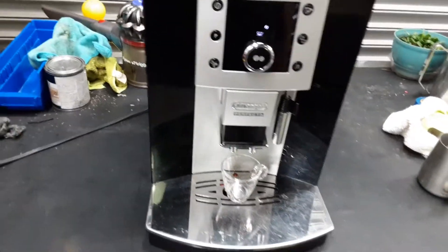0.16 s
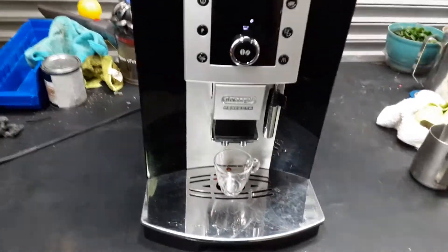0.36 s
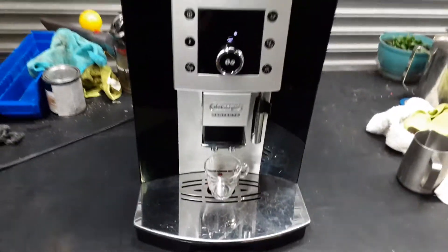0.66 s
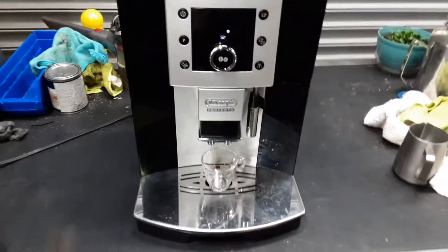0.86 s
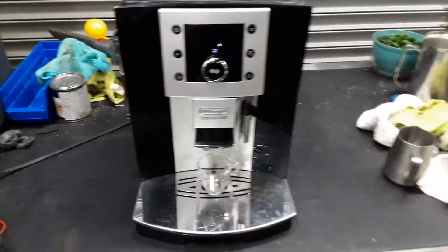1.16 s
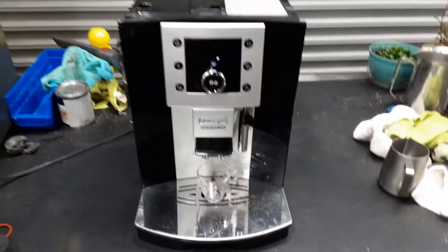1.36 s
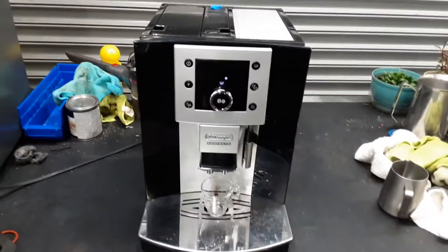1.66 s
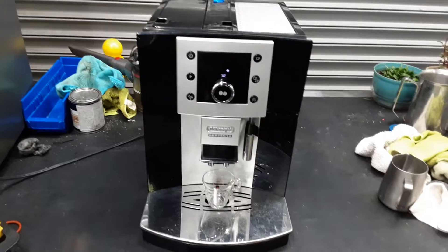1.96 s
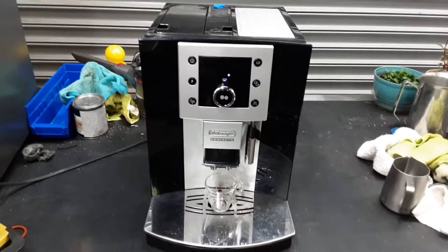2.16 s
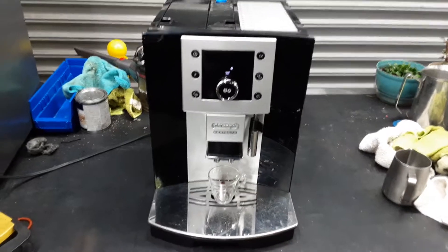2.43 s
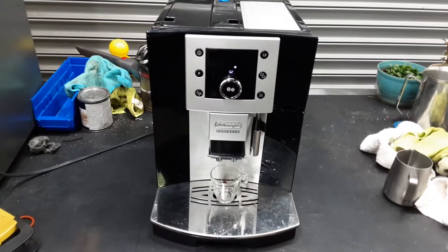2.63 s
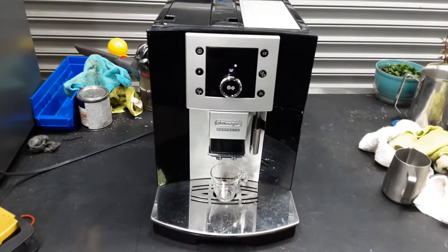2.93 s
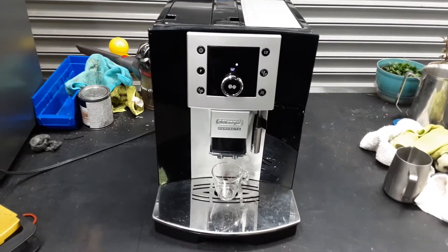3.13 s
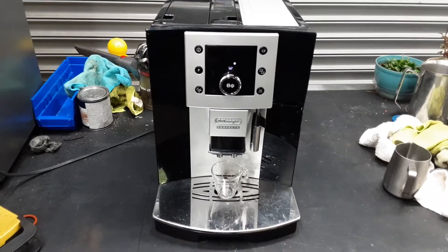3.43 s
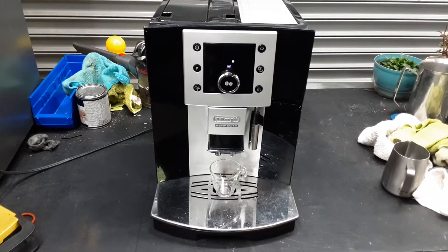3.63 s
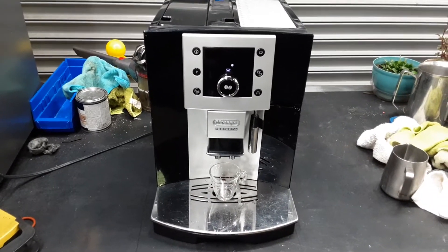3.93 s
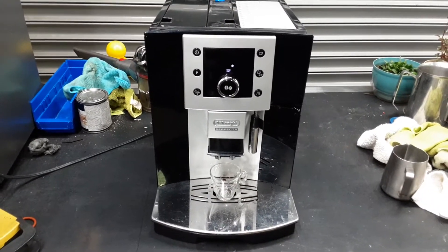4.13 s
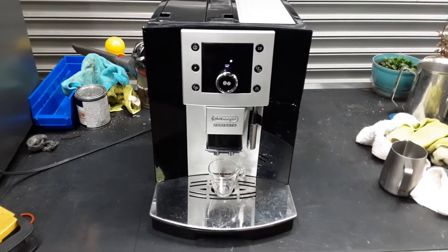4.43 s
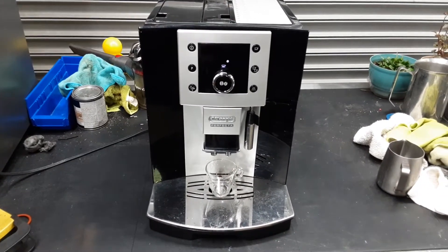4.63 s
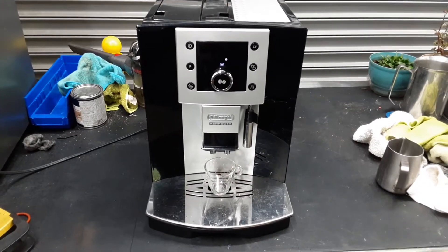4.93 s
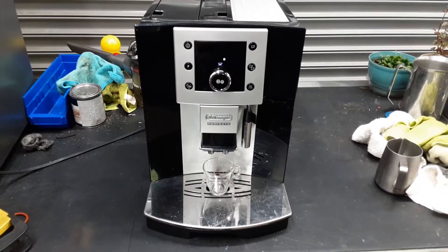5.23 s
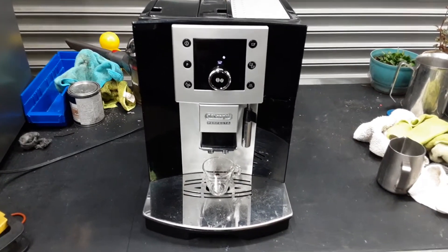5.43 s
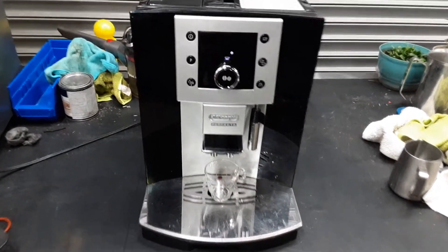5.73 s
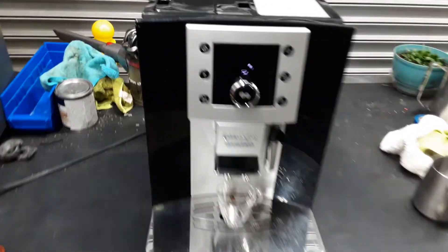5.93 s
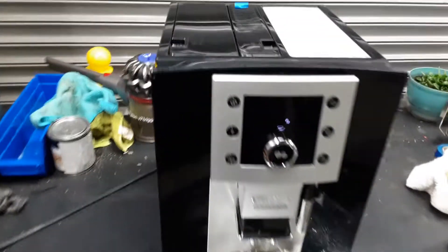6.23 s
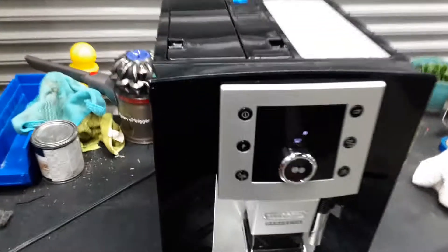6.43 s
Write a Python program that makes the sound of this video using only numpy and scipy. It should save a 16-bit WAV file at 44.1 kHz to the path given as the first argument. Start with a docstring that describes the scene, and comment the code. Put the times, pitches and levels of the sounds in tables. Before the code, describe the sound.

Close to an automatic coffee machine in a workshop with soft ventilation rumble. Two faint control clicks come first, then a geared motor whirs with a raspy, fluttering, toothed buzz, and dull plastic knocks sound early in its travel. It coasts quickly to a stop. After a short gap a bean grinder surges up and keeps running, rough and crunchy with a deep drone and thin whine, growing stronger as the microphone moves closer at the end.

```python
"""A workshop bench with an automatic coffee machine on it, taken in mono from close by over room ventilation.
Two light clicks of the controls, then a geared motor whirs and coasts to a stop: toothed lines and rasp,
swelling once a turn, with knocks of the brew unit as bursts and rings early in its travel.
Then the mains-driven grinder runs up: shaped noise for the beans, shaken tones for the shaft and commutator.
Its deep drone and its whine grow as the microphone moves closer."""
import sys
import numpy as np
from scipy import signal
from scipy.fft import rfft, irfft
from scipy.io import wavfile

SR = 44100
rng = np.random.default_rng(int(sys.argv[2]) if len(sys.argv) > 2 else 0)


def inscribe(sig):
    """Save sig as 16-bit PCM at rate SR to the path in sys.argv[1].

    A 1-D sig is mono; a 2-D sig holds one channel per row.
    Samples are clipped to [-1, 1] before scaling.
    """
    pcm = np.round(np.clip(np.atleast_2d(sig).T, -1, 1) * 32767)
    wavfile.write(sys.argv[1], SR, pcm.astype(np.int16))


N = 290178
TIME = np.arange(N) / SR
BINS = np.fft.rfftfreq(N, 1 / SR)

MAINS_HZ = 60
MAINS_PULSE = 2 * np.pi * 2 * MAINS_HZ * TIME  # phase of the power pulses, two a mains cycle
DRIVE_ON_S, DRIVE_OFF_S = 1.103, 3.467  # the gear motor's switch
GRINDER_ON_S, BITE_S = 3.984, 0.0077  # the grinder's start, and the time for its burrs to bite


def amp(db):
    """Decibels to gain."""
    return 10 ** (np.asarray(db) / 20)


def unit(x):
    """Scales to rms 1."""
    return x / np.sqrt(np.mean(x ** 2) + 1e-20)


def read(points, hz):
    """Reads a spectrum on a log-frequency axis."""
    f, value = np.transpose(points)
    return np.interp(np.log(hz + 1), np.log(f + 1), value)


def colour(x, spectrum):
    """Filters x with a spectrum's relative levels, then scales to rms 1."""
    return unit(irfft(rfft(x) * amp(read(spectrum, BINS)), N))


def noise():
    """White noise."""
    return rng.standard_normal(N)


def wander(hz):
    """Slow chance of rms 1, up to about hz."""
    return unit(irfft(rfft(noise()) * np.exp(-(BINS / hz) ** 2), N))


def curve(points):
    """Joins (s, value) points into a curve over time."""
    return np.interp(TIME, *np.transpose(points))


def since(s):
    """Seconds elapsed after s, zero before."""
    return np.maximum(TIME - s, 0)


def rise(s, lag):
    """Climbs from 0 at time s towards 1, with a time constant of lag seconds."""
    return 1 - np.exp(-since(s) / lag)


def add(mix, s, sound):
    """Mixes a sound in at s seconds."""
    part = mix[round(s * SR):][:len(sound)]
    part += sound[:len(part)]


def ring(modes):
    """Dying sines of a struck object."""
    t = TIME[:SR // 2]
    return sum(amp(db - 60 * t / t60) * np.sin(2 * np.pi * hz * t) for hz, db, t60 in modes)


def burst(hz, octaves, t60):
    """A sudden, dying puff of noise round a centre frequency."""
    t = TIME[:SR // 2]
    edges = hz * 2. ** np.array([-octaves, octaves])
    edges = np.minimum(edges, [SR / 2 - 2000, SR / 2 - 1000])  # stay below half the sample rate
    band = signal.butter(3, edges, "bandpass", fs=SR, output="sos")
    puff = rng.standard_normal(len(t)) * amp(-60 * t / t60)
    return signal.sosfilt(band, puff) * np.sqrt(SR / 2 / np.ptp(edges))  # narrow bands keep their strength


def reverb(x):
    """The workshop's tail: noise whose bands die at their own speeds."""
    # time for each band of the room to fall by 60 dB: f/Hz, t60/s
    room_t60 = [(150, 1), (1000, 0.33), (3000, 0.6), (7000, 0.35), (15000, 0.22)]
    hz, _, bands = signal.stft(rng.standard_normal(SR // 2), SR, nperseg=256)
    # the frames of the transform are read 128 samples apart
    t = np.arange(bands.shape[1]) * 128 / SR
    tail = signal.istft(bands * amp(-60 * t / read(room_t60, hz)[:, None]), SR, nperseg=256)[1]
    return signal.fftconvolve(x, tail / np.linalg.norm(tail))[:N]


def room_tone(vent_db=-58, air_db=-74.5, waver=0.038, hiss_db=-61.5, hiss_fall_db_per_s=75):
    """Ventilation rumble and faint air as shaped noise, wavering hum tones, and a soft hiss dying at the start."""
    # ventilation rumble: f/Hz, relative level/dB per Hz
    vent_spectrum = [(18, -47), (30, -43), (49, -13.5), (86, -11.5), (106, -21.5), (178, -10), (288, -16.5),
                     (324, -10.5), (364, -13), (383, -13.5), (909, -24.5), (1600, -36.5), (2080, -76),
                     (3520, -120)]
    # faint air: f/Hz, relative level/dB per Hz
    air_spectrum = [(880, -39), (1500, -36), (1860, -3.5), (2160, 0.5), (2630, -6), (2960, -17),
                    (4020, -14.5), (4350, -5), (5240, -10.5), (5840, -9), (6640, -11), (7260, -11.5),
                    (9280, -25), (11300, -9), (15800, -18)]
    # opening hiss: f/Hz, relative level/dB per Hz
    hiss_spectrum = [(710, -36), (1200, -6), (1870, -3), (2060, -3), (2220, 2), (2750, -13), (7430, -8.5),
                     (8450, -18), (12100, -9), (15800, -16)]
    # room hum: f/Hz, level/dB
    hum_tones = [(253.0, -67.5), (296.1, -66), (359.7, -60)]
    hum = sum(amp(db) * np.sqrt(2) * np.sin(2 * np.pi * hz * TIME) * (1 + waver * wander(12))
              for hz, db in hum_tones)
    vent = amp(vent_db) * colour(noise(), vent_spectrum)
    air = amp(air_db) * colour(noise(), air_spectrum)
    hiss = amp(hiss_db - hiss_fall_db_per_s * TIME) * colour(noise(), hiss_spectrum)
    return vent + air + hum + hiss


def clicks(room_db=-5, attack_s=0.00047):
    """Light clicks of the controls: dry ticks of dying noise with a faint metallic ring."""
    # clicks: t/s, level/dB, t60/s, metallic ring level/dB (ring() is halved below)
    click_events = [(0.281, -52, 0.088, -50.5), (0.58, -44, 0.088, -78)]
    # tick: f/Hz, relative level/dB per Hz
    tick_spectrum = [(590, -29), (1000, 2), (1700, -9), (1930, -16), (2170, -2), (2730, -6), (2890, -4),
                     (3250, -7), (5400, -2), (7120, -3), (9180, -18), (11700, 0.5), (15800, -17)]
    # metallic ring: f/Hz, relative level/dB, t60/s
    metal_modes = [(5303, -5, 0.12), (6153, -10, 0.14), (6720, -1, 0.11), (6900, 1, 0.092),
                   (7150, -9, 0.15)]
    out = np.zeros(N)
    for s, db, t60, ring_db in click_events:
        envelope = amp(db - 60 * TIME / t60) * (1 - np.exp(-TIME / attack_s))
        add(out, s, envelope * colour(noise(), tick_spectrum))
        add(out, s, amp(ring_db) * ring(metal_modes) / 2)
    return out + amp(room_db) * reverb(out)


def drive_state(spin_up_s=0.026, coast_s=0.17, load_on_s=1.61, load_lag_s=0.12):
    """The gear motor's share of its running speed, and its load (0 running free, 1 pushing the brew unit)."""
    spin = rise(DRIVE_ON_S, spin_up_s) * np.maximum(1 - since(DRIVE_OFF_S) / coast_s, 0)
    return spin, rise(load_on_s, load_lag_s)


def run_up(missing_share=0.42, run_up_s=0.19):
    """The share of its running speed the grinder still lacks; it draws extra current until this is gone."""
    return missing_share * np.exp(-since(GRINDER_ON_S) / run_up_s)


def mains_hum(drive_db=-59, load_db=5.0, grinder_db=-55.0, inrush_db=13, second_db=-8, third_db=-9):
    """The machine hums at even multiples of the mains, as strongly as its motors draw current."""
    spin, load = drive_state()
    drive_current = spin * amp(drive_db + load_db * load)
    grinder_current = rise(GRINDER_ON_S, BITE_S) * amp(grinder_db + inrush_db * run_up())
    hum = sum(amp(db) * np.sin((k + 1) * MAINS_PULSE) for k, db in enumerate([0, second_db, third_db]))
    return (drive_current + grinder_current) * np.sqrt(2) * hum


def gear_motor(tones_db=-39.8, rasp_db=-48, casing_db=-49.5, treble_db=-54.0, overtones_db=-56.0,
               sing_db=-53.5, mesh_load_db=-1.24, sing_load_db=-10, engage_s=0.13, mesh_power=2.9,
               rattle_power=1.55, jitter=0.0019, flutter=0.16, throb_start=0.83, throb_end=0.41,
               room_db=-7, casing_throb=0.054, wobble_rad=0.01):
    """An off-centre gear bites harder and drags once a turn, swelling tones, rasp and casing; it sings when free."""
    # running speed, sagging as the brew unit resists: t/s, turn rate/Hz
    drive_speed = [(1.2, 58.6), (1.45, 59.9), (1.6, 59.4), (1.74, 57.3), (2.0, 56.4), (2.45, 56.9),
                   (2.65, 57.5), (3.05, 56.9), (3.3, 57.4)]
    # teeth in mesh: multiple of the turn rate, relative level/dB
    gear_orders = [(20.1, -17.5), (21, 3.5), (22, 2), (24, 4)]
    # gear tones that do not throb: multiple of the turn rate, relative level/dB
    gear_overtones = [(11.4, -6), (13, -6), (35, -15), (38.1, -13), (43, -14), (44, -11), (45, -15),
                      (48, -13.5)]
    # rasp of the gearbox: f/Hz, relative level/dB per Hz
    gearbox_spectrum = [(650, -41), (1095, -46), (1145, 9), (1220, 12.5), (1280, 4), (1410, 10.5),
                        (1550, -22), (2020, -35), (3410, -120)]
    # casing rattle, lower part: f/Hz, relative level/dB per Hz
    casing_spectrum = [(29, -47), (50, -14), (118, -9.5), (146, -11), (229, 1.5), (327, -12), (362, 1.5),
                       (433, -12), (741, -9.5), (864, -14.5), (1060, -8), (1380, -64), (2330, -120)]
    # casing rattle, treble: f/Hz, relative level/dB per Hz
    treble_spectrum = [(880, -30.5), (1500, 1.5), (1610, -4.5), (1880, -8.5), (2000, -6.5), (2340, -10.5),
                       (2600, -10.5), (3020, -15), (3750, -21), (5780, -25.5), (6640, -22.5), (7470, -24),
                       (9370, -37), (11500, -29), (15800, -36)]

    spin, load = drive_state()
    angle = 2 * np.pi * np.cumsum(spin * curve(drive_speed) * (1 + jitter * wander(30.0))) / SR
    throb = np.clip(curve([(DRIVE_ON_S, throb_start), (DRIVE_OFF_S, throb_end)]), 0, 1)
    bite = 1 - throb * np.cos(angle)
    shake = 1 - casing_throb * np.cos(angle)

    def tones(orders, turn):
        """Fluttering lines on multiples of the turn rate."""
        return np.sqrt(2) * sum(amp(db) * (1 + flutter * wander(40)) * np.cos(k * turn) for k, db in orders)

    teeth = tones(gear_orders, angle + wobble_rad * throb * np.sin(angle))
    teeth /= np.linalg.norm([amp(db) for _, db in gear_orders])
    rasp = amp(rasp_db) * colour(noise() * bite, gearbox_spectrum)
    teeth = amp(tones_db) * bite * teeth + rasp
    sing = amp(sing_db + sing_load_db * load) * np.sqrt(2) * np.cos(36 * angle)
    casing = amp(casing_db) * colour(noise(), casing_spectrum)
    casing = shake * (casing + amp(treble_db) * colour(noise(), treble_spectrum))
    overtones = amp(overtones_db) * tones(gear_overtones, angle)
    mesh = rise(DRIVE_ON_S, engage_s) * spin ** mesh_power  # slow teeth hardly ring the gearbox
    rattle = spin ** rattle_power
    return (mesh * (teeth * amp(mesh_load_db * load) + sing) + rattle * (casing + overtones)
            + amp(room_db) * reverb(rattle * casing))


def knocks(ring_db=-17, room_db=-9, bright_hz=1000, t60=0.031):
    """The plastic brew unit knocks as it travels; dull blows ring its body most."""
    # knocks: t/s, level/dB, centre f/Hz, half width/octaves
    knock_events = [(1.122, -46, 790, 0.68), (1.163, -34, 607, 0.61), (1.179, -39, 332, 1.1),
                    (1.636, -29.5, 1940, 0.27), (1.7838, -27, 710, 1.07), (1.791, -27.5, 200, 1.04),
                    (1.803, -31.5, 290, 1.14), (1.841, -34, 320, 2.04), (1.861, -39, 240, 1.6)]
    # body of the brew unit: f/Hz, relative level/dB, t60/s
    brew_unit_modes = [(89, 2.5, 0.16), (183, -1, .09), (251, 4, 0.13), (419, 2, 0.1), (660, 9, .07),
                       (1004, 9, 0.061), (1490, -1, 0.079), (2080, -7, .06)]
    out = np.zeros(N)
    for s, db, hz, octaves in knock_events:
        dullness = 1 / (1 + (hz / bright_hz) ** 2)
        add(out, s, amp(db) * burst(hz, octaves, t60))
        add(out, s, amp(db + ring_db) * dullness * ring(brew_unit_modes))
    return out + amp(room_db) * reverb(out)


def cracks(room_db=-7):
    """Single beans crack loudly, each a dying burst of noise."""
    # cracks: t/s, level/dB, centre f/Hz, half width/octaves
    crack_events = [(4.302, -50, 9000, .8), (4.722, -37.5, 3200, 0.55), (4.733, -53, 3220, 0.45),
                    (4.81, -49, 14540, .25), (4.93, -54, 12010, .5), (5.057, -49, 12490, 0.27),
                    (5.141, -39, 10000, 0.98), (6.176, -24, 347, 0.19), (6.336, -36, 3440, 0.91),
                    (6.434, -39, 8940, 0.96)]
    out = np.zeros(N)
    for s, db, hz, octaves in crack_events:
        add(out, s, amp(db) * burst(hz, octaves, t60=0.14))
    return out + amp(room_db) * reverb(out)


def fractures(per_s, spread_db):
    """Tiny snaps of breaking beans at random moments: many small, a few larger."""
    size = amp(spread_db * np.minimum(rng.exponential(1, N), 4))
    return unit(noise() * size * (rng.random(N) < per_s / SR))


def grinder_gain(db, near_db, speed_power):
    """One grinder voice's level: a power of the speed, changed by near_db as the microphone closes in."""
    near = curve([(5.59, 0), (6.06, 1)])  # the approach, from and to (s)
    return rise(GRINDER_ON_S, BITE_S) * (1 - run_up()) ** speed_power * amp(db + near_db * near)


def tone(phase, rough, shake_hz=30, patchy_db=2.6):
    """A motor line of rms 1, shaken by the load."""
    line = np.cos(phase) + rough * (wander(shake_hz) * np.cos(phase) + wander(shake_hz) * np.sin(phase))
    return unit(line * amp(patchy_db * wander(33)))


def housing(x):
    """The housing rings at its narrow resonances when x shakes it."""
    # housing resonances: f/Hz, width/Hz, relative level/dB
    resonances = [(1820, 51, -50.5), (2892, 50, -62), (3030, 37, -50.5), (4120, 17, -58), (4640, 14, -60.5),
                  (6000, 170, -59), (11400, 150, -69)]
    spectrum = rfft(x)
    return sum(amp(db) * unit(irfft(spectrum / (1 + 2j * (BINS - hz) / width), N))
               for hz, width, db in resonances)


def beans(surge_db=0.93, torque_ripple=0.021):
    """Beans snap between the burrs: a rumble of the housing, the grinding itself and a bright crunch."""
    # rumble: f/Hz, relative level/dB per Hz
    rumble_spectrum = [(40, -37), (90, -26), (160, -18), (195, -15.5), (220, 7.5), (260, 1.5), (300, -1),
                       (345, 1), (450, -2), (520, -7.5), (700, -38.5)]
    # grinding: f/Hz, relative level/dB per Hz
    grinding_spectrum = [(270, -24), (460, -8.5), (492, -6), (619, 6), (674, 3), (740, 4), (806, 0.5),
                         (971, 2.5), (1360, -4.5), (1820, -3.5), (2070, -8), (2740, -14.5), (3110, -29),
                         (3350, -16), (3500, -49.5), (4550, -63), (7700, -120)]
    # crunch: f/Hz, relative level/dB per Hz
    crunch_spectrum = [(1940, -15.5), (3300, -8), (3390, -2), (3710, 0.5), (5220, -7), (6190, -4),
                       (6520, -4.5), (7340, -4), (8530, -15.5), (11600, -14.5), (13700, -18), (15200, -21),
                       (15800, -13)]
    feed = amp(surge_db * wander(42))  # beans feed unevenly
    snaps = fractures(per_s=6000, spread_db=1.0) + 1.12 * noise()
    snaps *= 1 + torque_ripple * np.cos(MAINS_PULSE)  # the torque pulses with the mains
    rumble = colour(snaps * feed, rumble_spectrum)
    grinding = colour(snaps * feed, grinding_spectrum)
    crunch = colour(snaps * np.sqrt(feed) + noise(), crunch_spectrum)
    return (housing(snaps * feed) * grinder_gain(db=-2.5, near_db=-1.0, speed_power=1.9)
            + rumble * grinder_gain(db=-35.5, near_db=3.0, speed_power=1.7)
            + grinding * grinder_gain(db=-34, near_db=2.5, speed_power=1.37)
            + crunch * grinder_gain(db=-44.0, near_db=2.5, speed_power=1.6))


def drone(angle, rough=0.25):
    """The grinder's shaft drones at its turn rate and above."""
    # overtones: multiple of the turn rate, relative level/dB
    grinder_orders = [(1.7, -8.5), (2, -10.5), (3.38, -17.5), (4.73, -18.5), (6.8, -25.5), (9, -29),
                      (13, -27.5), (14, -38), (15, -26), (16, -27), (24, -41)]
    overtones = sum(amp(db) * tone(k * angle, rough) for k, db in grinder_orders)
    return (tone(angle, rough) * grinder_gain(db=-36.8, near_db=7, speed_power=3.4)
            + overtones * grinder_gain(db=-31.5, near_db=-6.5, speed_power=3.1))


def whine(speed, angle, upper_db=-6.5, lower_db=-7, rough=0.15, scatter=3.3, patchy_db=1.2,
          panel_hz=3193, panel_half_width_hz=76, panel_boost_db=14,
          squeal_db=-33, squeal_rough=1.6, squeal_power=0.9, lag_s=0.032, swell_s=0.048):
    """The commutator whines eight times a turn with mains sidebands, lifted by a panel; it squeals running up."""
    lines = np.zeros(N)
    for side, db in [(-1, lower_db), (0, 0), (1, upper_db)]:
        hz = 8 * speed + side * 2 * MAINS_HZ
        phase = 8 * angle + side * MAINS_PULSE
        panel_db = panel_boost_db / (1 + ((hz - panel_hz) / panel_half_width_hz) ** 2)
        lines += amp(db + panel_db) * tone(phase, rough + scatter * run_up(), patchy_db=patchy_db)
    start_s = GRINDER_ON_S + lag_s
    lines *= rise(start_s, swell_s) * grinder_gain(db=-47.5, near_db=7, speed_power=.1)
    squeal = amp(squeal_db) * run_up() ** squeal_power * rise(start_s, BITE_S)
    return lines + squeal * tone(14 * angle, squeal_rough, shake_hz=220)


def grinder(jitter=0.00166):
    """One mains motor runs up to speed and drives the burrs, the drone and the whine."""
    # running speed as the bean load varies: t/s, turn rate/Hz
    grinder_speed = [(4.18, 376), (4.32, 361), (4.6, 367), (4.9, 365), (5.1, 375), (5.66, 376),
                     (5.9, 388.6), (6.1, 380.5), (6.22, 382.5), (6.34, 379), (6.47, 369.4), (6.58, 373.5)]
    speed = curve(grinder_speed) * (1 - run_up())
    angle = 2 * np.pi * np.cumsum(speed * (1 + jitter * wander(19.6))) / SR
    return beans() + drone(angle) + whine(speed, angle)


def scene():
    """The machine and its room, in mono."""
    return (room_tone() + clicks() + mains_hum() + gear_motor() + knocks() + cracks() + grinder())[None]


def record(dry, low_cut_hz=42, edge_hz=15790):
    """The recorder's bass cut and band limit."""
    lean = signal.sosfilt(signal.butter(3, low_cut_hz, "highpass", fs=SR, output="sos"), dry)
    band_limit = signal.firwin(511, edge_hz, window=("kaiser", 9), fs=SR)
    return signal.oaconvolve(lean, band_limit[None], "same")


dry = scene()
out = record(dry)
inscribe(out)
```